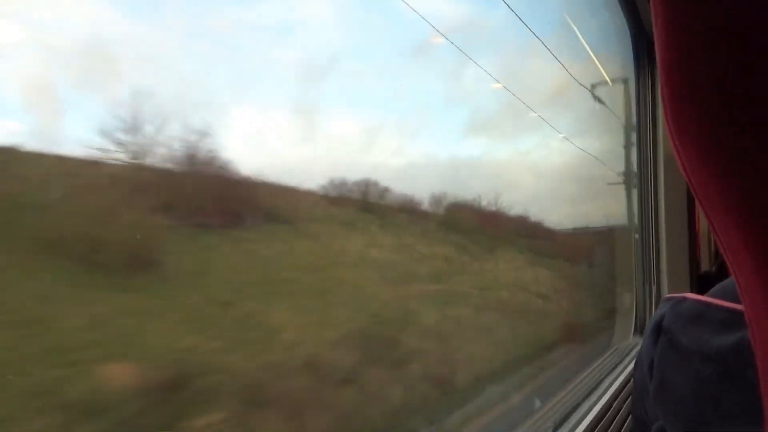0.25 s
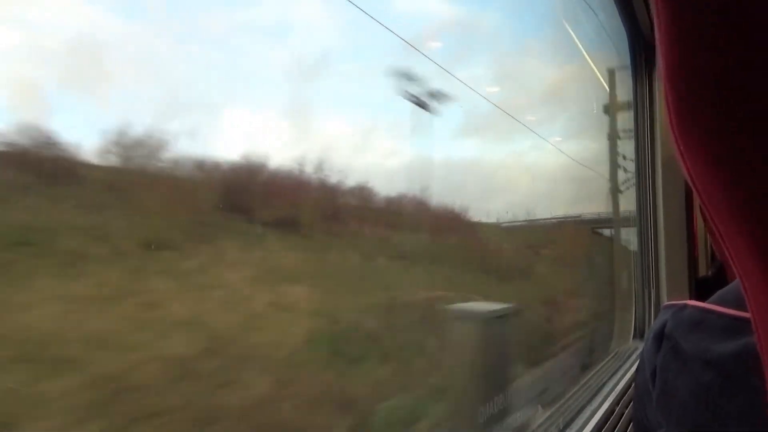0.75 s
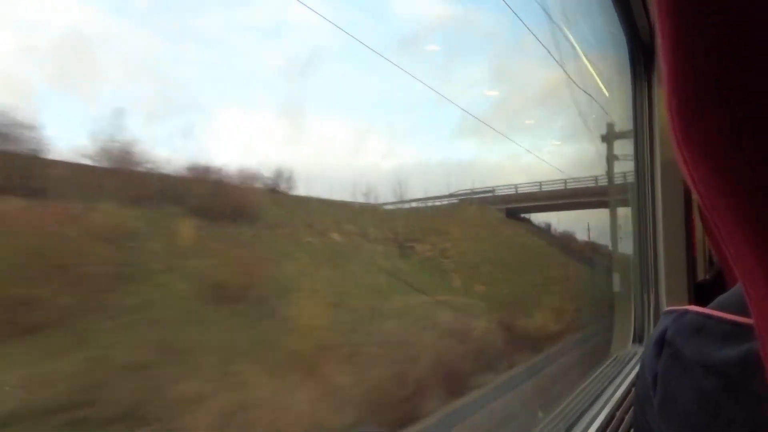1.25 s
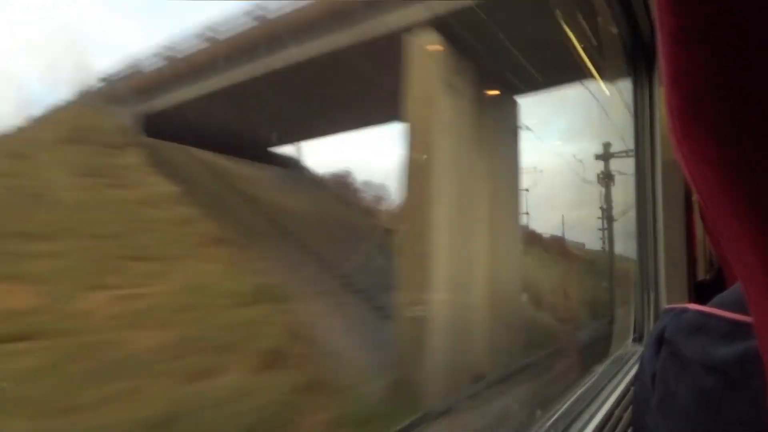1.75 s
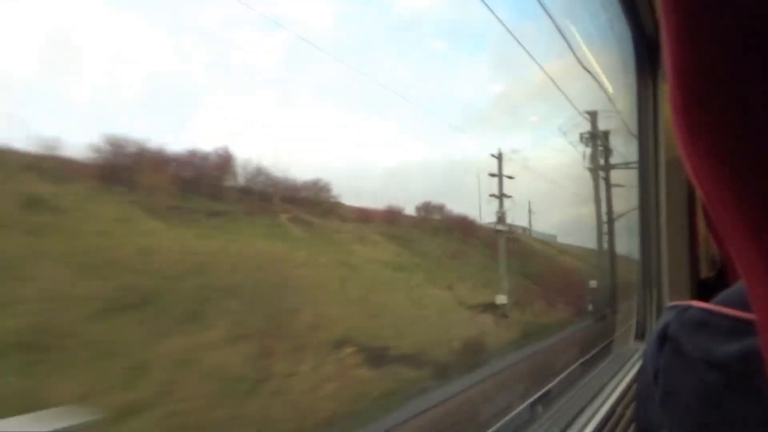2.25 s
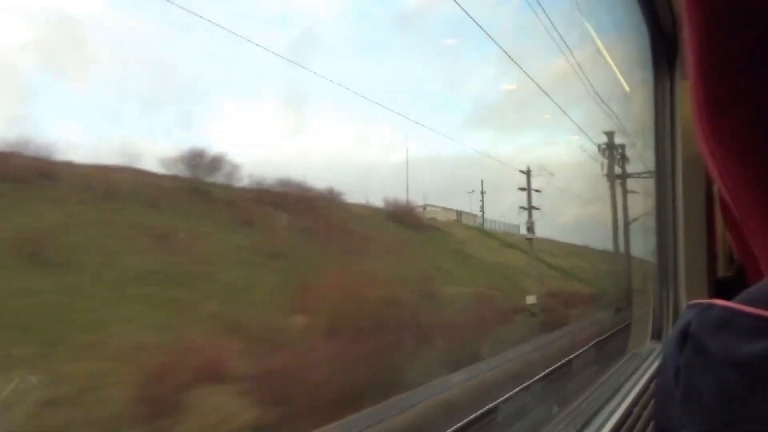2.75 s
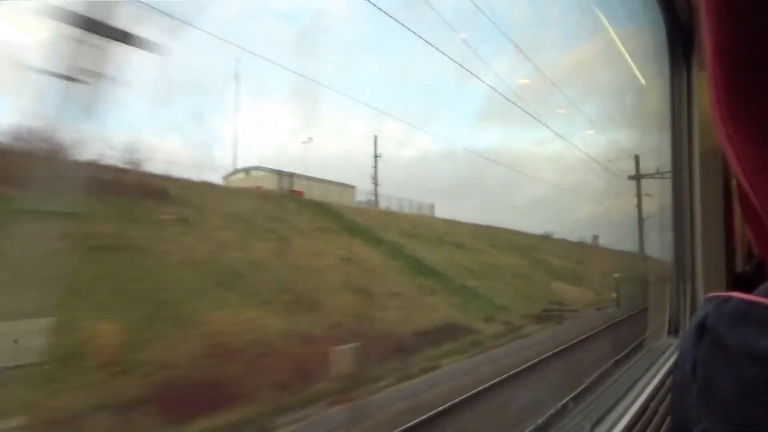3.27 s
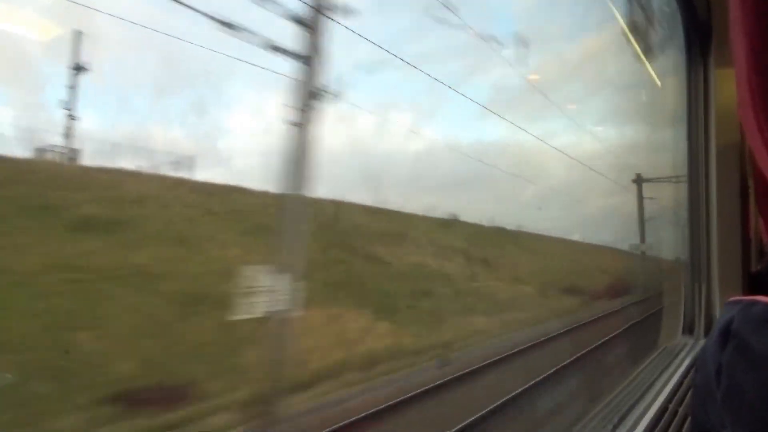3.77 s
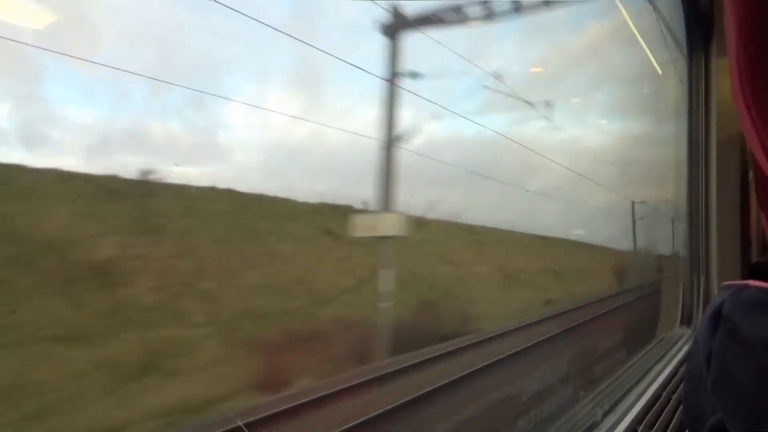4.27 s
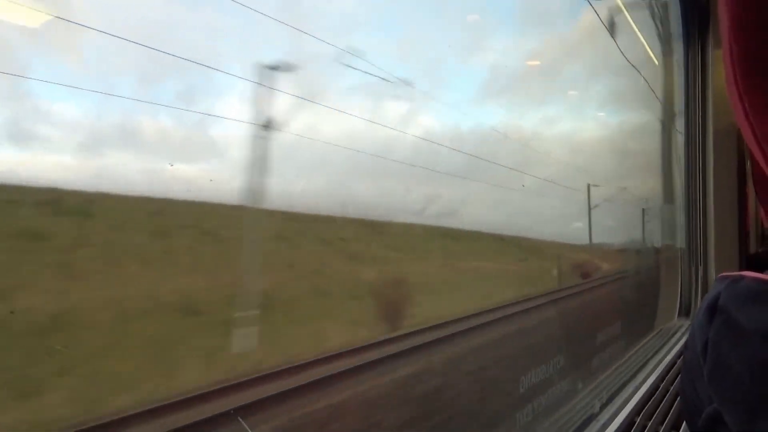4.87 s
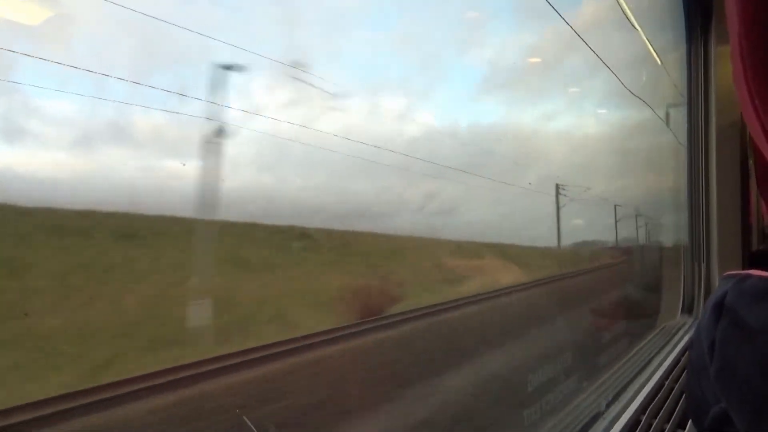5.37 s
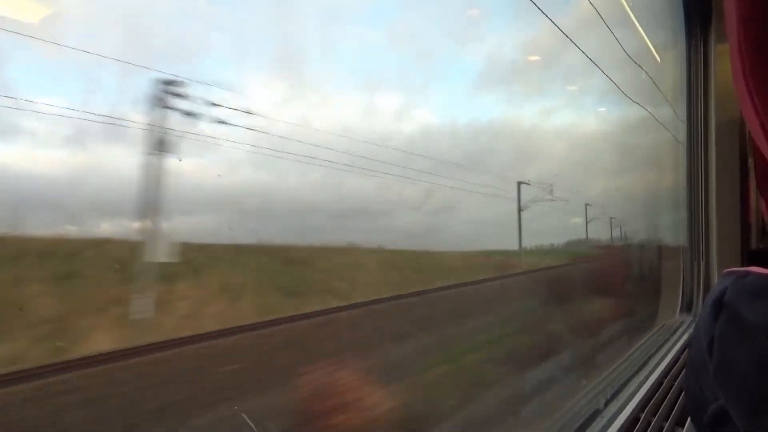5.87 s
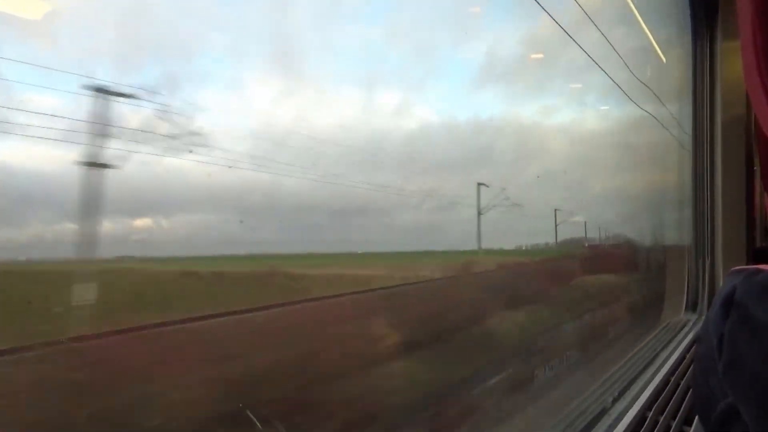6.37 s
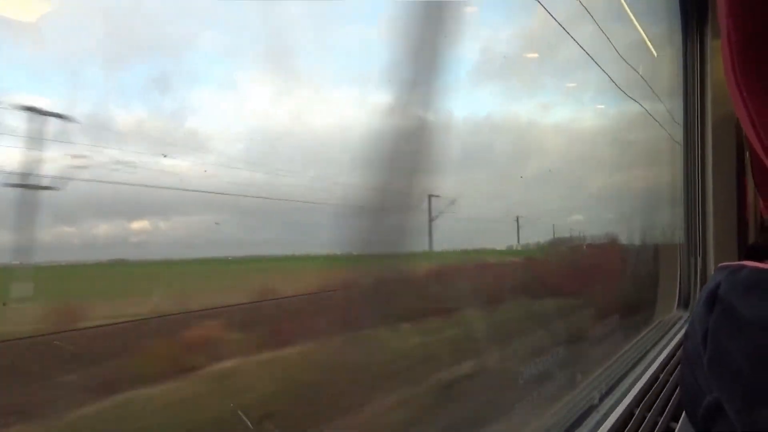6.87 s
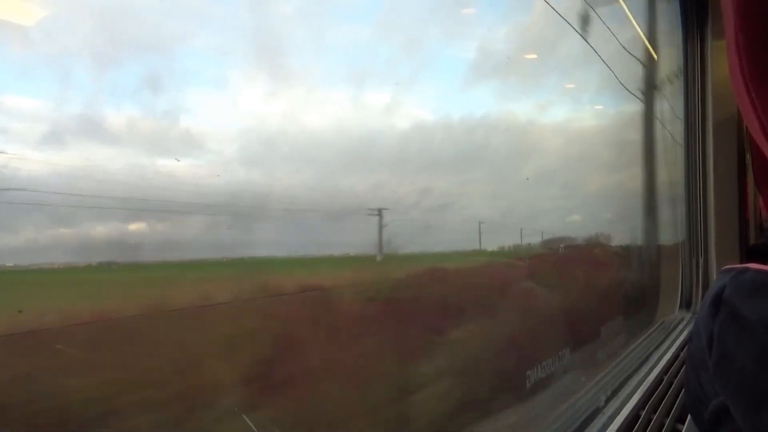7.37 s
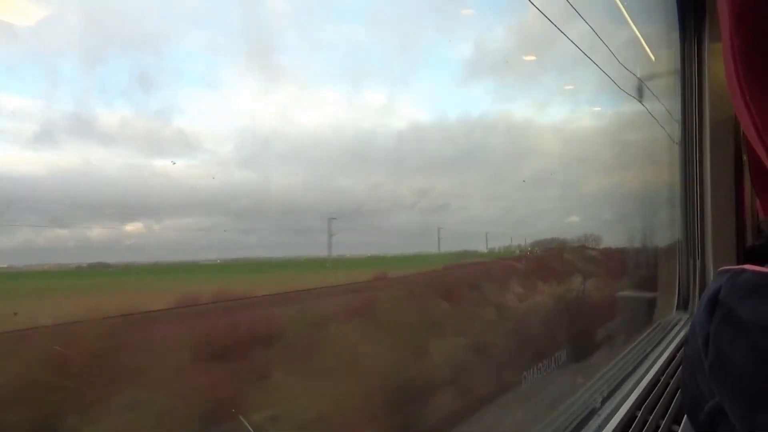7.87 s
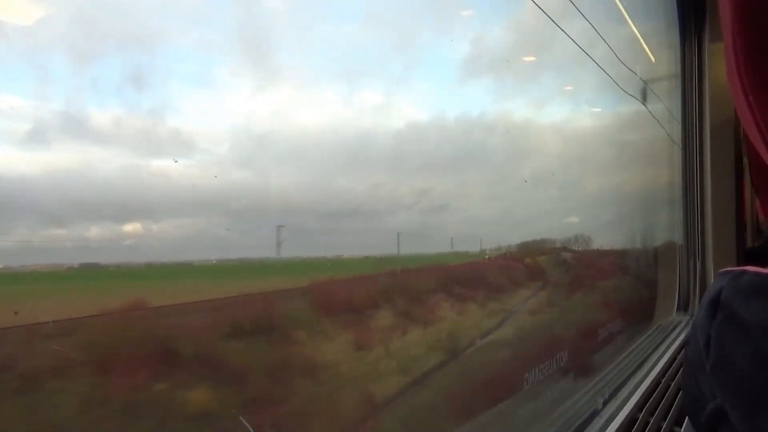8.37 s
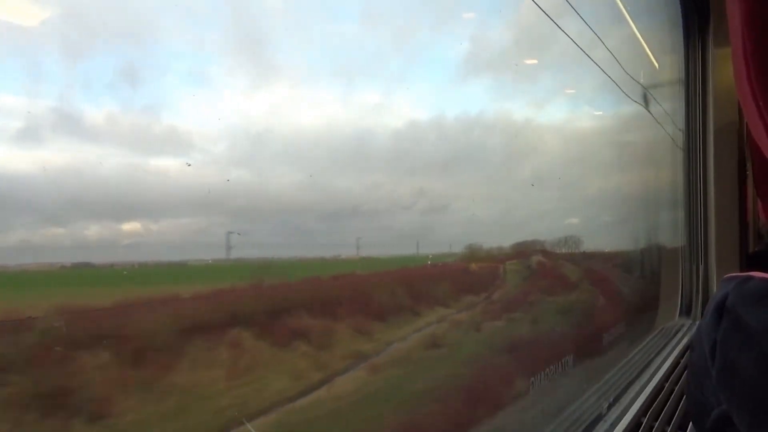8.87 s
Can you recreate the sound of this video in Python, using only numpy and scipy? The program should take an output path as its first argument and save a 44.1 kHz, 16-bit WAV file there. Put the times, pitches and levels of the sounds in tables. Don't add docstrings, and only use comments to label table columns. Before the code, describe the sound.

Inside a speeding train coach, a heavy low rumble surges unevenly under faint window hiss, broken by trim creaks, thumps and sharp handling clacks.

```python
import sys
import numpy as np
from scipy import signal
from scipy.fft import irfft, next_fast_len
from scipy.io import wavfile
from scipy.ndimage import uniform_filter1d

SR = 44100
rng = np.random.default_rng(int(sys.argv[2]) if len(sys.argv) > 2 else 0)


def transcribe(signal):
    frames = np.atleast_2d(signal).T
    limited = np.clip(frames, -1, 1)
    pcm = np.round(limited * 32767).astype(np.int16)
    wavfile.write(sys.argv[1], SR, pcm)


def linear_from_db(decibels):
    return 10 ** (np.asarray(decibels, float) / 20)


N = 402633
TIME, FAST = np.arange(N) / SR, next_fast_len(N)
HZ = np.maximum(np.arange(FAST // 2 + 1) * SR / FAST, 1)
STEP = 64
SPAN = SR // 6


def along(table):
    hz, value = np.transpose(table)
    return np.interp(np.log(HZ), np.log(np.maximum(hz, 1)), value)


def level(x, db):
    return x * linear_from_db(db) / np.sqrt(np.mean(x ** 2))


def walk(rate):
    held = int(SR / rate)
    steps = np.repeat(rng.standard_normal(N // held + 1), held)
    return 1.34 * uniform_filter1d(uniform_filter1d(steps, held), held)[:N]


def swell(s, half):
    return np.exp(-((TIME[::STEP] - s) / half) ** 2)


def evened(x, span):
    k = int(span * SR)
    power = np.mean(x ** 2, axis=0)
    return x / np.sqrt(uniform_filter1d(uniform_filter1d(power, k), k))


# (frequency [Hz], likeness [0-1])
STEREO_LIKENESS = [(60, 0.95), (130, 1), (290, 0.74), (640, 0.68), (1410, 0.54), (3100, 0.85), (6820, 0.55),
                   (10500, 0.84), (15000, 1)]
# (frequency [Hz], left minus right [dB])
PORT_BALANCE = [(60, -2), (110, -2), (200, -1.5), (330, -0.3), (700, 3.5), (1290, 1.5), (2380, 3),
                (4400, 2), (8120, 0), (15000, 0.0)]
# (frequency [Hz], left lead [rad])
PORT_LEAD = [(0, 0.84), (340, -0.52), (860, -0.55), (1460, -0.38), (2150, -0.51), (3530, -0.31),
             (7060, -0.15), (11000, 0.03), (15700, 0.0)]


def ports(gain):
    shared, left, right = rng.standard_normal((3, len(HZ))) + 1j * rng.standard_normal((3, len(HZ)))
    like = np.clip(along(STEREO_LIKENESS), 0, 1) ** 0.59
    turn = np.exp(1j * 0.71 * along(PORT_LEAD))
    tilt = linear_from_db(along(PORT_BALANCE) / 2)
    common = np.sqrt(like) * shared * [turn, 1 / turn]
    own = np.sqrt(1 - like) * np.array([left, right])
    return gain * (common + own) * [tilt, 1 / tilt]


def restless(pair, lo_hz, hi_hz, flicker_db, rate):
    out = 0
    for hz in lo_hz * 2 ** np.arange(0, np.log2(hi_hz / lo_hz) + .1, .5):
        share = np.cos(np.pi * np.clip(np.log2(HZ / hz), -.5, .5)) ** 2
        band = irfft(pair * share, FAST)[:, :N]
        out = out + band * linear_from_db(flicker_db * walk(rate))
    return level(out, 0)


# (frequency [Hz], width [Hz], rms level [dB])
BODY_MODES = [(37.6, 23, -33.5), (64.24, 2.5, -27), (203.7, 11.4, -38), (422.1, 9.4, -47.5), (588, 36, -48),
              (897, 18, -55.5), (1818, 18, -60), (2504, 36, -58.5), (2894, 46, -60)]


def resonances(lo_hz, hi_hz):
    gain = 0
    for hz, width, db in BODY_MODES:
        if lo_hz < hz < hi_hz:
            gain = gain + linear_from_db(db) / np.sqrt(width) / (1 + ((HZ - hz) / width * 2) ** 2)
    return irfft(ports(gain), FAST)[:, :N] * np.sqrt(FAST * SR / np.pi)


# (time [s], floor boom level [dB])
TRACK_ROUGHNESS = [(0, -22.5), (.9, -20.5), (1.9, -22), (2.3, -17), (2.95, -19.5), (3.3, -20), (4.2, -19.5),
                   (4.8, -16.5), (5.4, -18), (6, -19.5), (6.8, -17), (7.3, -20), (7.65, -15), (8, -21.5),
                   (8.5, -17), (9.13, -22)]
# (time [s], peak boom level [dB])
RAIL_JOLTS = [(.03, -18), (.28, -19.5), (.45, -23), (.64, -18), (.98, -16), (1.08, -15), (1.17, -18.5),
              (1.35, -17), (1.55, -17.5), (1.77, -19.5), (1.93, -19), (3.13, -14.5), (3.38, -17),
              (3.68, -20.5), (3.91, -19.5), (4.2, -19), (5.31, -19), (5.54, -21.5), (5.71, -22),
              (5.93, -20.5), (6.17, -22.5), (6.41, -20), (6.57, -22.5), (6.99, -18.5), (7.2, -21),
              (7.92, -17), (8.07, -16.5), (8.25, -17.5), (8.75, -18), (9.06, -16)]
# (time [s], level change [dB])
REFLECTING_WALLS = [(0, -1), (.9, 1), (1.2, 2.5), (1.55, -1.5), (2.0, .5), (3.4, -0.5), (3.75, 0),
                    (4.05, 1), (4.25, -1), (4.65, 1.5), (5.0, 0), (5.35, 1), (5.7, -1.5), (6.3, .5),
                    (6.95, -1), (7.65, 1.5), (8.15, -2.5), (9.13, .5)]
# (time [s], length [s], level over the steady rush [dB])
WINDOW_GUSTS = [
    (.87, 0.26, 2.5),
    (1.272, 0.73, -1.5),
    (1.963, 0.3, 1.5),
    (3.842, 0.22, 1),
    (4.22, 0.16, 1),
    (6.44, 0.28, 2.5),
    (7.117, 0.41, 3),
    (7.82, 0.45, 2.5),
]


def motion():
    power = linear_from_db(np.interp(TIME[::STEP], *np.transpose(TRACK_ROUGHNESS))) ** 2
    for s, db in RAIL_JOLTS:
        power = power + linear_from_db(db) ** 2 * swell(s, 0.046)
    boom_db = np.interp(TIME, TIME[::STEP], 10 * np.log10(power))
    gusts = sum(db * swell(s, length / 2) for s, length, db in WINDOW_GUSTS)
    rush_db = -41 + 1.1 * walk(8) + np.interp(TIME, TIME[::STEP], gusts)
    drum_db = -26.5 + 0.16 * (boom_db - boom_db.mean()) + 1.16 * walk(11)
    drum_db = drum_db + np.interp(TIME, *np.transpose(REFLECTING_WALLS))
    return boom_db, drum_db, rush_db


# (frequency [Hz], level per Hz [dB])
ROLLING_SPECTRUM = [(12, -31), (20, -11.5), (59, -3), (107, -2.5), (171, -10.5), (204, -9), (284, -18),
                    (418, -24.5), (464, -27), (582, -22), (743, -30.5), (1300, -43.5), (1690, -66),
                    (2860, -120)]
# (frequency [Hz], level per Hz [dB])
AIR_SPECTRUM = [(590, -22), (1000, -10), (1140, -3), (1230, -6), (1720, -5.5), (1810, -3), (2230, -3),
                (2440, 0), (3580, -14), (5700, -20), (8350, -21.5), (10000, -26.5), (12000, -34.5),
                (15300, -41.5), (16000, -46)]


def coach():
    boom_db, drum_db, rush_db = motion()
    rolling = ports(linear_from_db(along(ROLLING_SPECTRUM)))
    air = ports(linear_from_db(along(AIR_SPECTRUM)))
    boom = level(restless(rolling, 17, 136, .5, 6), -19.5) + resonances(0, 170)
    drum = level(restless(rolling, 192, 1086, 1.1, 7), -27.5) + resonances(170, 1200)
    rush = level(restless(air, 1086, 3072, 1.2, 9), -39.5) + resonances(1200, SR)
    hiss = restless(air, 4344, 17400, .8, 12)
    chatter_db = 1.0 * walk(70)
    hiss_db = -51.13 + .5 * (rush_db - rush_db.mean()) + chatter_db
    out = linear_from_db(boom_db) * evened(boom, 0.081)
    out = out + linear_from_db(drum_db) * evened(drum, 0.28)
    out = out + linear_from_db(rush_db) * evened(rush, 0.13)
    return out + linear_from_db(hiss_db) * hiss


def ring(x, hz, width):
    return signal.lfilter(*signal.iirpeak(min(hz, .45 * SR), hz / width, SR), x)


def burst(length, apart):
    t = TIME[:SPAN]
    mid, side = rng.standard_normal((2, len(t)))
    return (mid + apart * side * np.array([[1], [-1]])) * np.exp(-np.log(1000) * t / abs(length))


def place(out, s, db, blow):
    out[..., int(s * SR):][..., :SPAN] += linear_from_db(db) * blow / np.abs(blow).max()


def ticks(rows):
    out = np.zeros((2, N + SR))
    for s, db, hz, bright_db, knock_db, length in rows:
        shell = (hz, 0.44 * hz, 0, .5)
        edge = (9000, 5400, bright_db, .17)
        knock = (1600, 1900, knock_db + 8.0, .45)
        for f, width, part_db, apart in (shell, edge, knock):
            push = burst(length, apart) + 0.14 * burst(4.6 * length, apart)
            push[:, 0] += 1.5
            place(out, s, db + part_db, ring(ring(push, f, width), f, width))
    return signal.lfilter(*signal.butter(1, 14000, fs=SR), out[:, :N])


# (time [s], peak level [dB], crackle over ring [dB], knock over ring [dB])
TRIM_CREAKS = [
    (0.016, -38, -1, -29),
    (0.8154, -38, -19, -10),
    (2.1016, -33, -24, -32),
    (2.184, -33, -25, 0),
    (2.709, -38, -15, 2),
    (2.9702, -33, -6, 0),
    (6.0164, -40, -19, -3),
    (6.354, -32, -20, -6),
    (6.4954, -37, -5, 3),
    (6.969, -29, -37, -18),
]


def creaks():
    return ticks([(s, db, 2790, bright, knock, 0.047) for s, db, bright, knock in TRIM_CREAKS])


# (time [s], peak level [dB], ring [Hz], crackle over ring [dB])
SHELL_SNAPS = [(0.0443, -30, 4790, -6), (0.064, -28, 6370, -7), (0.899, -27.5, 4160, -6),
               (1.8816, -27, 4140, -6), (3.056, -20, 4400, -16), (3.0825, -24, 4400, -1),
               (3.4624, -29.5, 3750, -5), (5.366, -36, 4550, 0), (6.2114, -31, 4170, -4),
               (7.7155, -28, 4500, -5), (8.1508, -33, 3600, -5), (8.2397, -37.5, 3850, 7),
               (8.7448, -32.5, 3980, -3)]


def snaps():
    return ticks([(s, db, hz, bright, -36.5 - db, 0.017) for s, db, hz, bright in SHELL_SNAPS])


# (time [s], length [s], level [dB], centre [Hz])
CLOTH_BRUSHES = [
    (0.125, .055, -44.5, 5930),
    (0.39, 0.1, -51.5, 7040),
    (0.865, 0.13, -53, 5500),
    (.86, 0.15, -42.5, 2400),
    (1.3, 0.26, -59, 4800),
    (5.17, 0.057, -53, 6460),
    (4.497, 0.075, -49, 7700),
]


def brushes():
    out = 0
    for s, length, db, hz in CLOTH_BRUSHES:
        stroke = ring(ring(rng.standard_normal(N), hz, .45 * hz), hz, .45 * hz)
        out = out + level(stroke, db) * np.exp(-((TIME - s) / (length / 2)) ** 4)
    return out


# (time [s], peak level [dB], mode [Hz])
FLOOR_THUMPS = [(0.393, -20, 480), (1.019, -17, 369), (1.795, -25.5, 530), (2.049, -27, 570),
                (2.574, -21, 423), (2.71, -29, 580), (3.079, -21, 410), (3.807, -25, 437),
                (5.923, -32, 678), (6.196, -27, 495), (6.499, -22, 353), (3.83, -31, 800), (3.9, -30, 680)]


def thumps():
    out = np.zeros((2, N + SR))
    contact = 1 - np.exp(-(TIME[:SPAN] / 0.007) ** 2)
    for s, db, hz in FLOOR_THUMPS:
        blow = burst(0.12, 0.43) * contact
        blow = ring(ring(ring(blow, hz, 520), hz, 520), hz, 520)
        place(out, s, db - 0.2, blow)
    return out[:, :N]


# (time [s], peak level [dB], mode [Hz])
PANEL_KNOCKS = [(.612, -25, 560), (.637, -26, 590), (.83, -26, 600), (.877, -25, 620), (1.101, -20, 620),
                (1.113, -23, 560), (2.184, -20, 520), (2.188, -25, 950), (2.262, -27, 900),
                (2.27, -25, 620), (2.328, -25, 560), (2.425, -31, 520), (2.439, -23, 600),
                (2.454, -22, 590), (2.487, -27, 570), (2.577, -19, 660), (2.59, -25, 560), (2.71, -24, 650),
                (3.0795, -22, 620), (3.086, -22, 700), (3.096, -24, 600), (5.927, -24, 950),
                (6.017, -24, 660), (6.198, -26, 900)]


def knocks():
    out = np.zeros((2, N + SR))
    for s, db, hz in PANEL_KNOCKS:
        push = 0.3 * burst(.012, 0.4)
        push[:, 0] += [3.4, 2.6]
        width = .3 * hz
        place(out, s, db, ring(ring(push, hz, width), hz, 2.2 * width))
    return out[:, :N]


# (time [s], peak level [dB], ring [Hz], crackle over ring [dB])
FINGER_SCUFFS = [
    (1.1872, -29.5, 4600, 0.5),
    (1.192, -33, 4600, -3),
    (1.3648, -33.5, 4900, -15),
    (1.4242, -35, 5540, -17),
    (5.2385, -29.5, 4240, -6),
    (7.5985, -26, 2600, -14),
]


def scuffs():
    return ticks([(s, db, hz, bright, -6, 0.042) for s, db, hz, bright in FINGER_SCUFFS])


# (time [s], peak level [dB], mode [Hz], length [s])
SHELL_PINGS = [(1.1875, -26, 4800, .02), (1.254, -28.5, 3040, .06), (2.5748, -17, 1540, .025),
               (3.056, -27, 8450, .01), (3.0556, -24, 2500, .008), (6.6796, -20, 8400, .03),
               (6.684, -27, 7800, .03), (7.563, -30, 2750, .02), (7.5982, -17.5, 3600, 0.02),
               (7.604, -24, 2400, .03), (7.603, -27, 1350, 0.025), (7.611, -27, 2500, .03),
               (7.643, -33, 2620, .02), (7.72, -30, 2550, .02), (5.94, -24, 3250, .02),
               (5.9235, -18, 3150, .02), (6.1925, -20, 3150, .015), (6.199, -23, 2300, .02),
               (6.21, -30, 3300, .015), (2.578, -27, 2250, .015), (2.321, -36, 5900, .01),
               (6.283, -36, 5600, .015)]


def pings():
    out = np.zeros((2, N + SR))
    for s, db, hz, length in SHELL_PINGS:
        push = burst(length, 0.58)
        push[:, 0] += 12.0
        width = 0.12 * hz
        place(out, s, db, ring(ring(push, hz, width), hz, 2.6 * width))
    return out[:, :N]


# (time [s], peak level [dB], crackle over ring [dB], knock over ring [dB], length [s])
HARD_CLACKS = [(1.251, -33.5, 5, -4, 0.05), (1.257, -36, 6, -4, 0.068), (2.5745, -35, 13, 2, 0.05),
               (2.578, -31.5, 6.5, -2, 0.1), (2.581, -31, -6, 1.5, 0.03), (3.0797, -31, 6, -3, 0.03),
               (3.0845, -25, 2, -3, 0.06), (3.095, -32, 4, 1, 0.04), (3.101, -29, -6, -4, 0.06),
               (5.9218, -17, -1, -30, 0.025), (5.926, -15.5, -7, -9, 0.03), (5.935, -22, -12, -19, 0.025),
               (6.192, -21, -12, -15, 0.03), (6.196, -22.5, -16, -2, 0.035), (6.679, -41, 8, 2, 0.03),
               (7.6568, -33.5, 8.5, -10, 0.03), (7.663, -38, 3.5, 3, 0.04), (7.674, -38, 2, -1, 0.03)]


def clacks():
    return ticks([(s, db, 3030, *rest) for s, db, *rest in HARD_CLACKS])


# (time [s], peak level [dB], centre [Hz])
SHELL_CRACKS = [
    (2.5818, -18, 1700),
    (3.0558, -21, 4000),
    (3.0821, -11.5, 4200),
    (3.083, -14, 2300),
    (5.922, -23, 4000),
    (6.1925, -27, 4000),
]


def cracks():
    out = np.zeros(N + SR)
    for s, db, hz in SHELL_CRACKS:
        width = 1.2 * hz
        place(out, s, db, ring(ring(signal.unit_impulse(SPAN), hz, width), hz, width))
    return out[:N]


# (time [s], level [dB])
WHEEL_SINGING = [(6.3, -49), (6.8, -43), (7.1, -42.5), (7.25, -45), (7.42, -50), (7.5, -43), (7.65, -45),
                 (7.8, -44), (7.97, -44), (8.1, -51), (8.4, -64)]


def singing():
    s, db = np.transpose(WHEEL_SINGING)
    narrow = 1 / (1 + ((HZ - 2522) / 55) ** 2)
    broad = linear_from_db(-8.5) / (1 + ((HZ - 2800) / 300) ** 2)
    mode = irfft(ports(narrow + broad), FAST)[:, :N]
    return level(mode, 0) * linear_from_db(np.interp(TIME, s, db, -90, -90) + 2.0 * walk(14))


def scene():
    small = creaks() + snaps() + brushes() + thumps() + knocks() + scuffs() + pings() + clacks() + cracks()
    return coach() + small + singing()


def band_limit(x):
    return signal.sosfilt(signal.butter(12, 15850, fs=SR, output="sos"), x)


def record(dry):
    heard = signal.sosfilt(signal.butter(2, 24, "high", fs=SR, output="sos"), dry)
    soft = np.tanh(0.98 * heard) / 0.88 * linear_from_db(1.35)
    mix = signal.sosfilt(signal.ellip(10, .2, 60, 15770, fs=SR, output="sos"), soft)
    return band_limit(mix)


dry = scene()
out = record(dry)
transcribe(out)
```